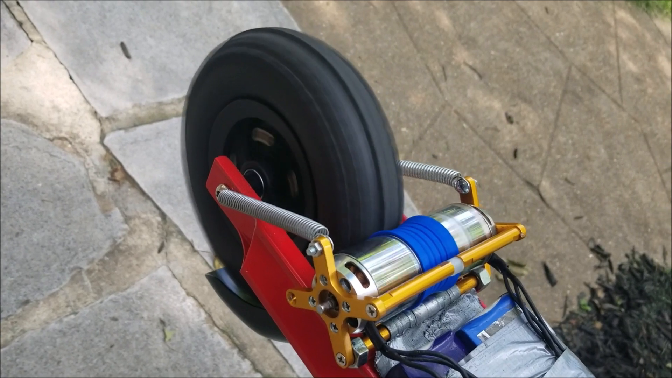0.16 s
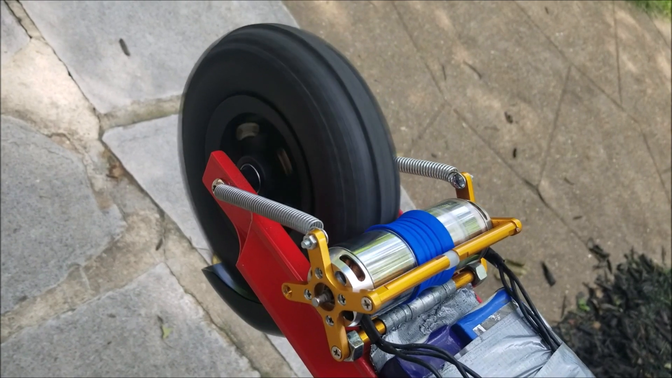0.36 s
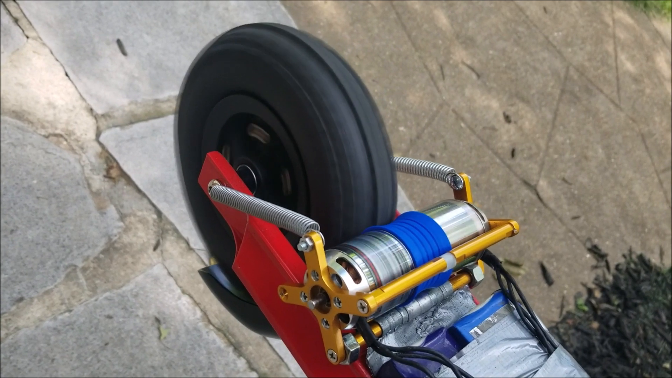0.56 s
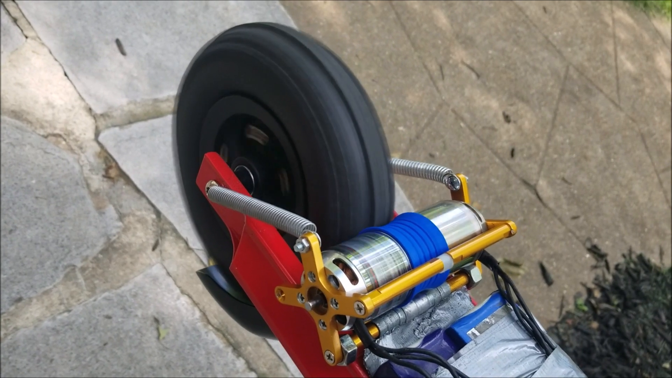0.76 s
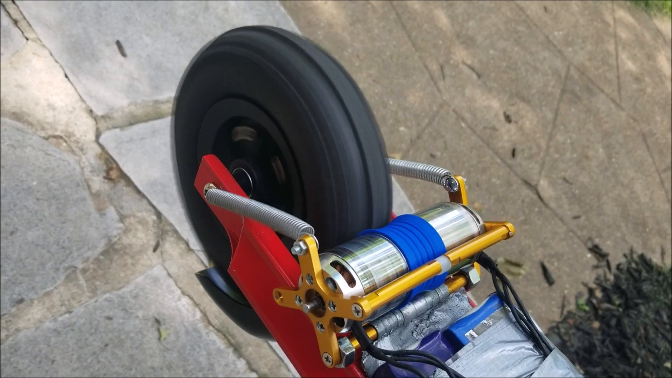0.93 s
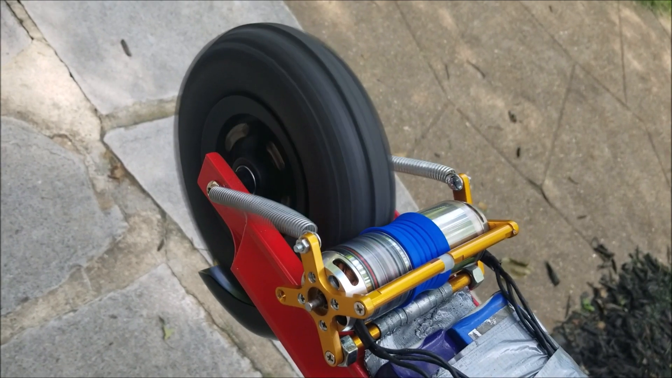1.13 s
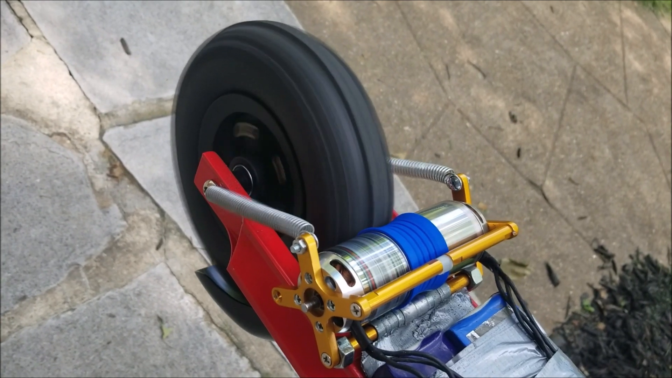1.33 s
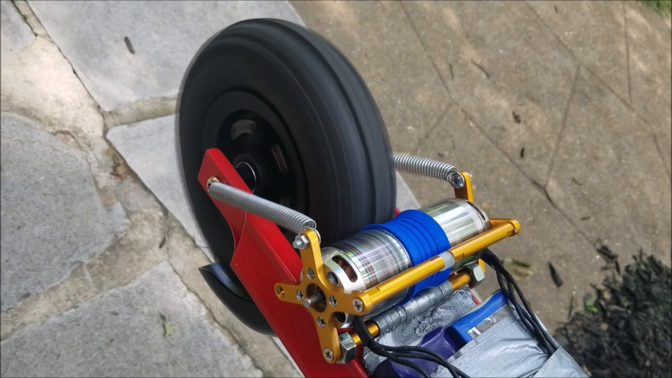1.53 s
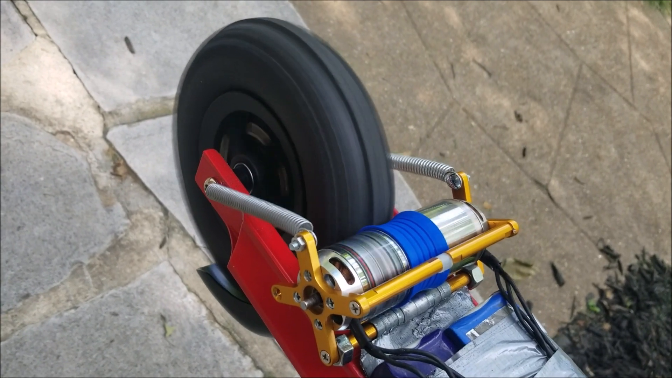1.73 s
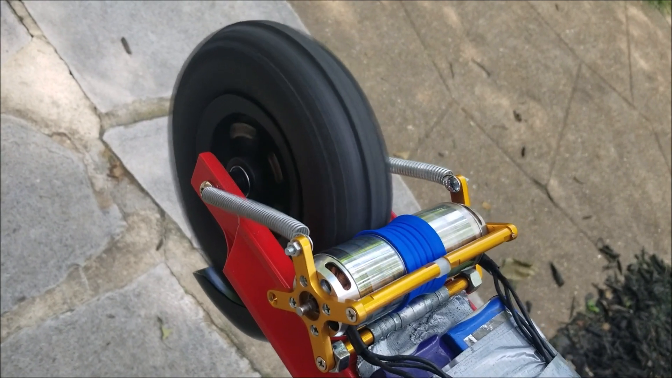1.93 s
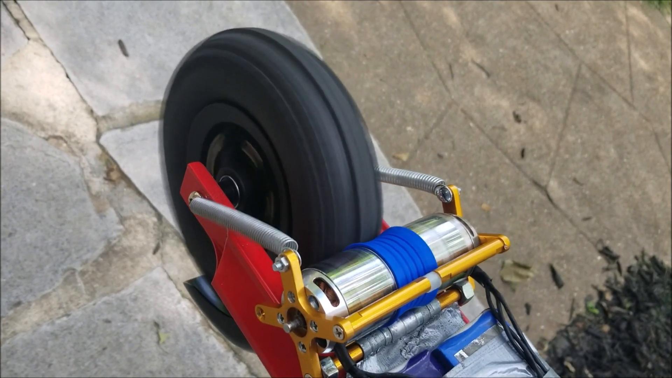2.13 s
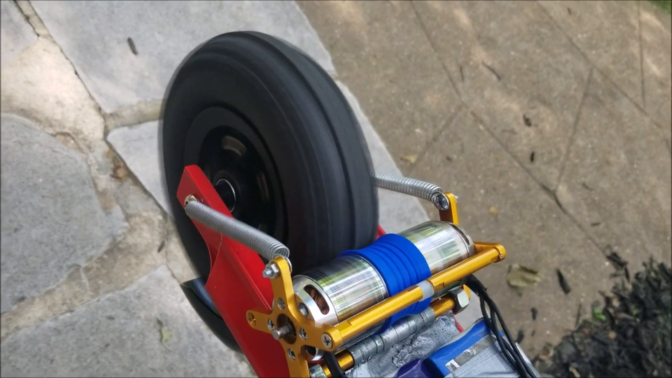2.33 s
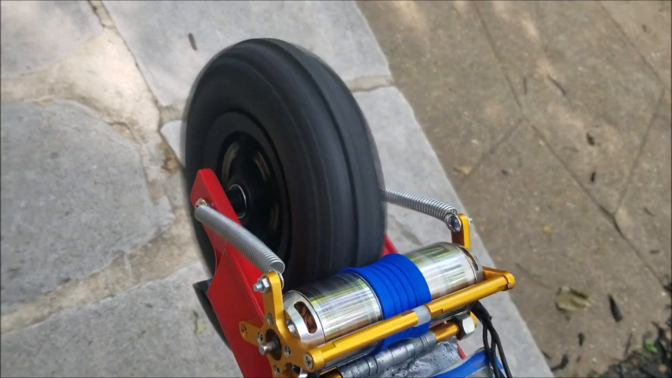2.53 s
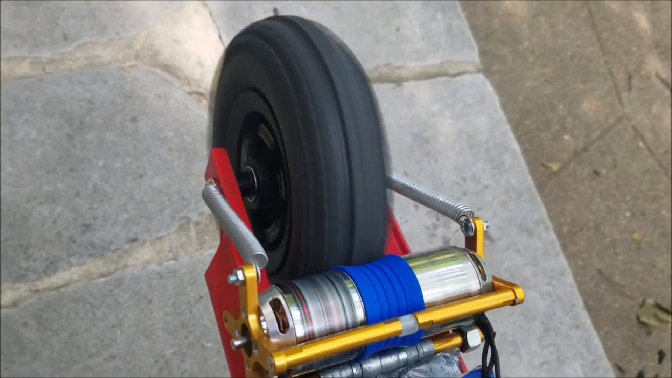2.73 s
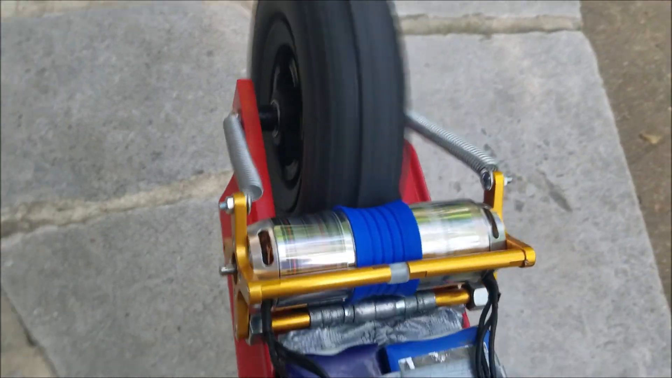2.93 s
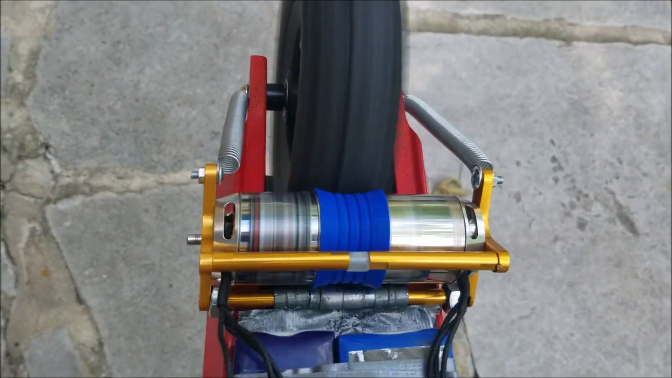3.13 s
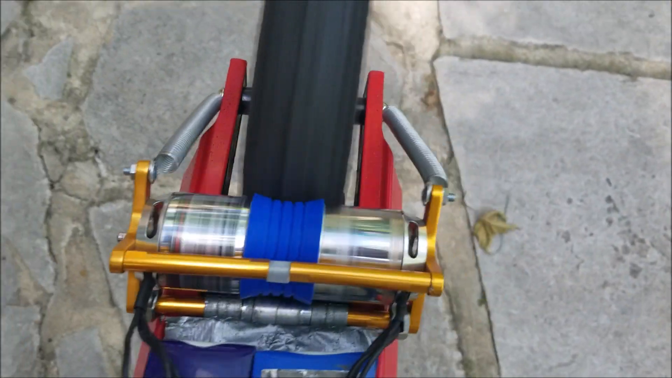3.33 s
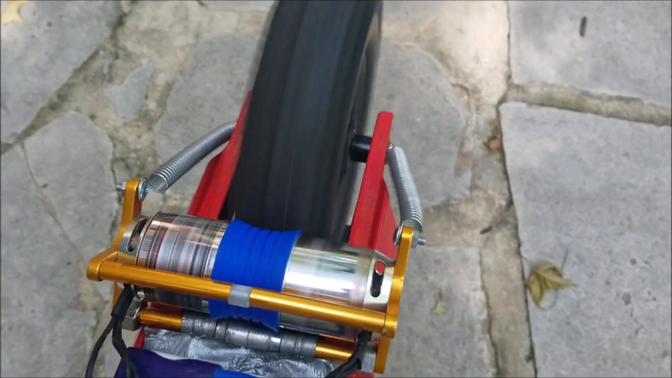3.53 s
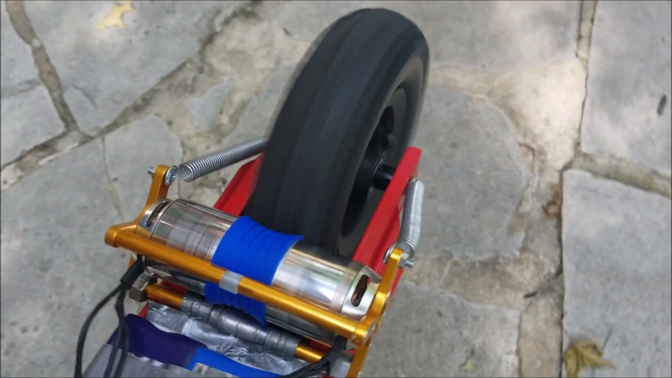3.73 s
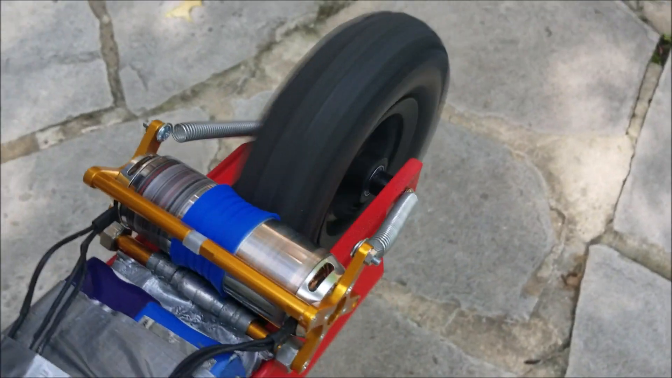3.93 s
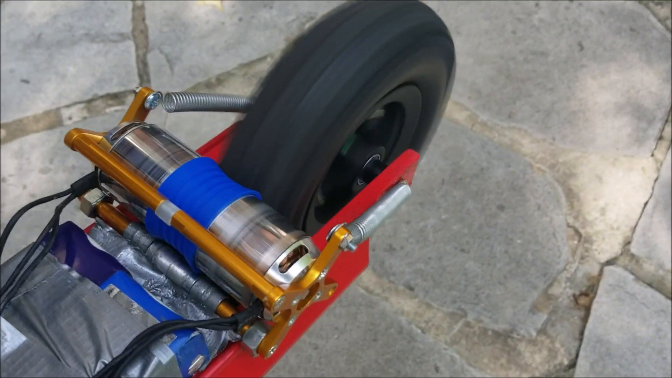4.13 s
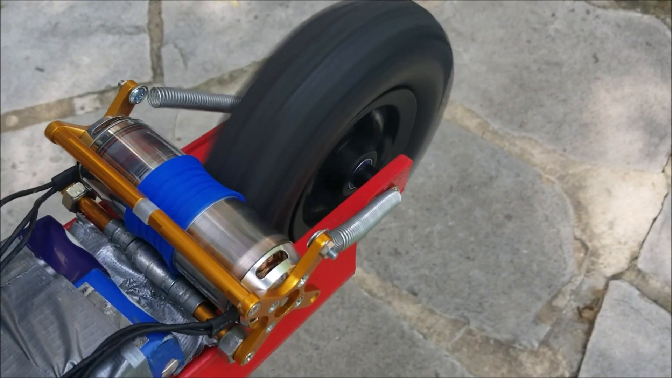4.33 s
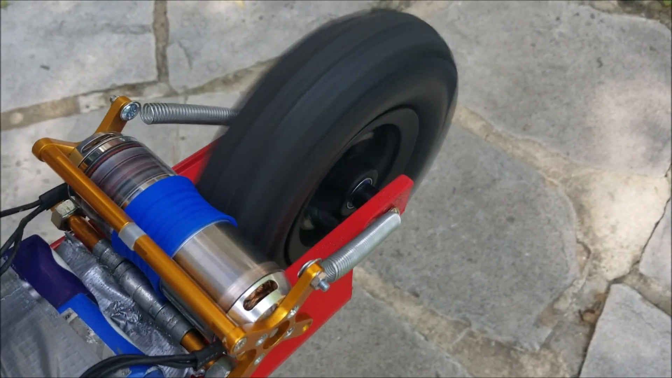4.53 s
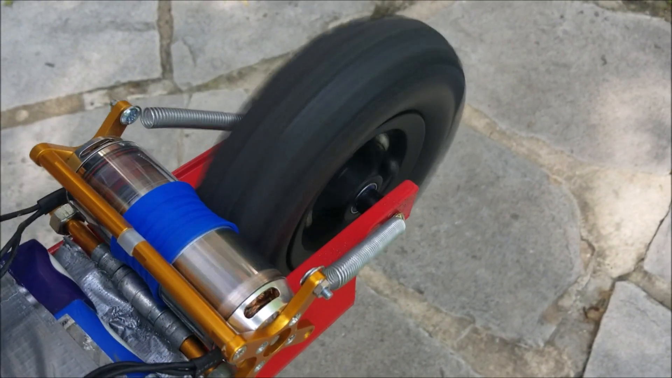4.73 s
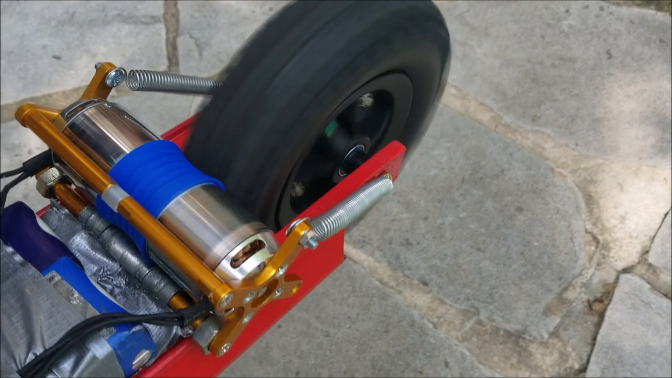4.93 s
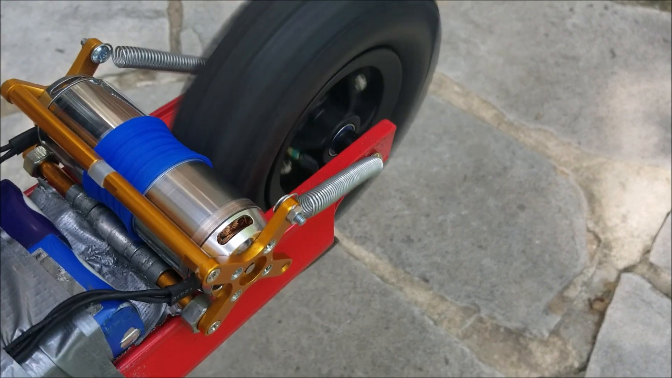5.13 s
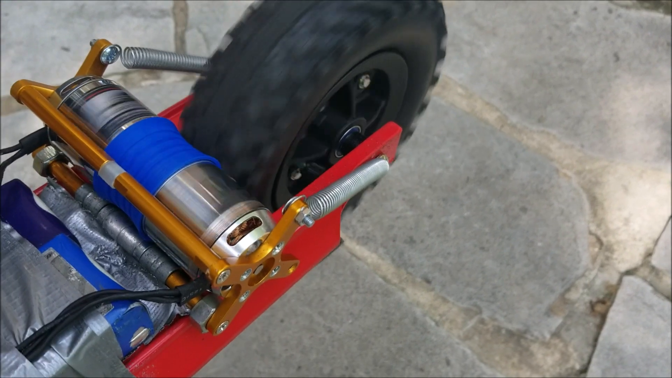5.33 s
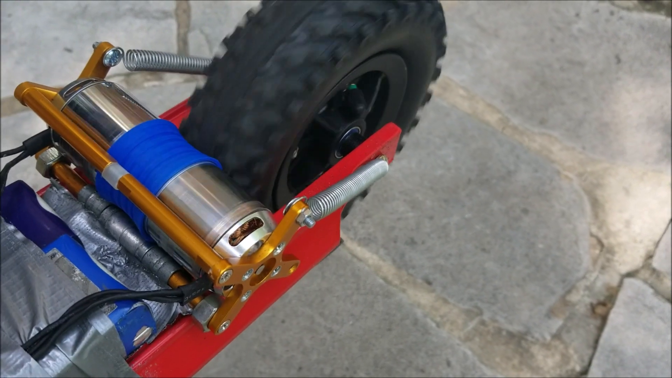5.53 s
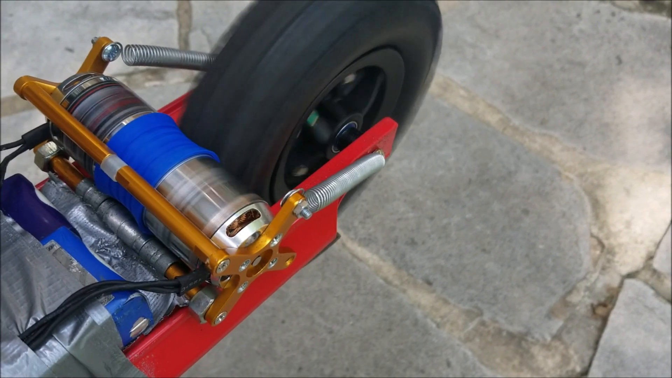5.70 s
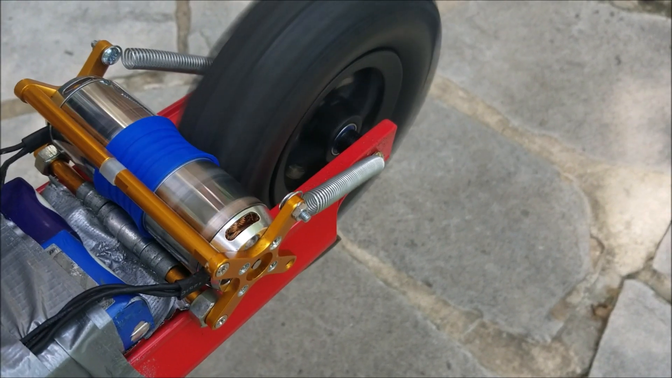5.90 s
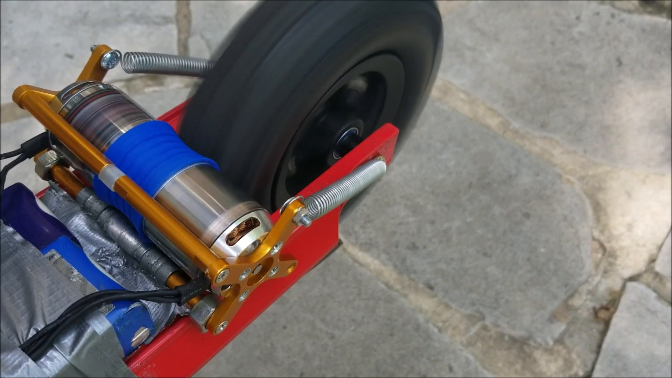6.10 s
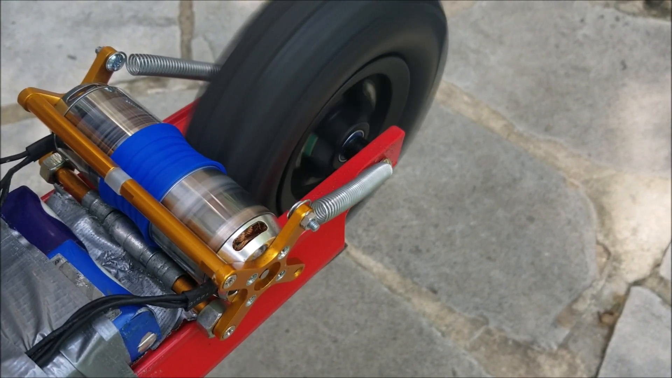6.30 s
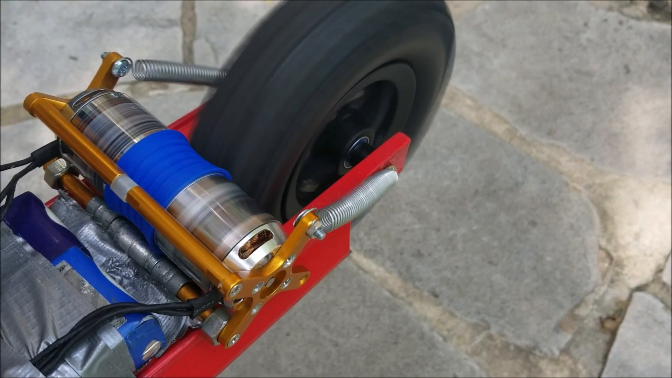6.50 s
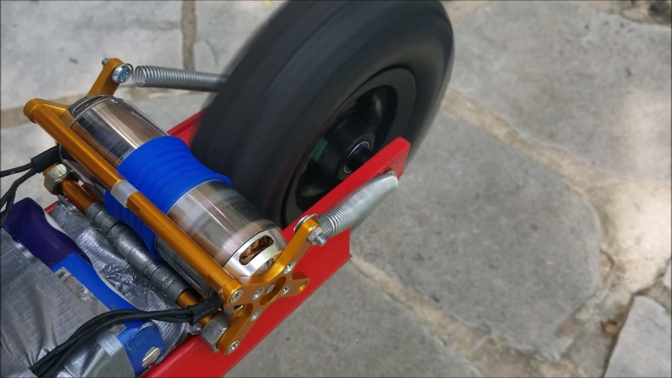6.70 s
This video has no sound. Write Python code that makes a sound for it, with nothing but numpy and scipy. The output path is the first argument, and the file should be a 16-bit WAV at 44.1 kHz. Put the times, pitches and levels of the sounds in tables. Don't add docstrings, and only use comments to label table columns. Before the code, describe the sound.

Outdoors and very close, two electric motors drive a roller against a knobby tyre. From 0 to 2 seconds a rough, layered whine climbs steadily by almost half an octave, tread hum below and metallic bearing tones above, wrapped in gritty rubber friction and bright air hiss pulsing rapidly. From 2 to 4.5 it holds at full speed; around 2.5 to 3.4 the microphone swings to the other end, shifting the tone colour and stereo balance, with brief bearing flares. At 4.5 the drive lets go and everything glides down, quietening to a near stop around 5.5, where faint dry clicks, thin high electronic whine and distant traffic rumble show through. From 5.6 it pulls away with splitting high tones and a steep rising whine, reaching full speed near 6.1. At 6.3 the pitch sags briefly, bottoms near 6.6, and rebounds to full speed by the end.

```python
import sys
import numpy as np
from scipy import signal
from scipy.fft import rfft, irfft, next_fast_len
from scipy.io import wavfile
from scipy.ndimage import uniform_filter1d, map_coordinates

SR = 44100
rng = np.random.default_rng(int(sys.argv[2]) if len(sys.argv) > 2 else 0)


def put_to_file(sound):
    columns = np.atleast_2d(sound).T
    safe = np.clip(columns, -1, 1)
    whole_steps = np.round(safe * 32767)
    wavfile.write(sys.argv[1], SR, whole_steps.astype(np.int16))


def how_loud(loudness_db):
    steps = np.asarray(loudness_db, float) / 20
    return 10 ** steps


N = 302511

# (frequency [Hz], density [dB/Hz])
TRAFFIC = [(15, -53), (25, -100), (43, 1), (147, -5), (216, -10.5), (262, -2.5), (283, -6.5), (318, -20),
           (818, -10.5), (1250, -16), (2500, -58), (3250, -61), (5500, -120)]
# (time [s], peak level [dB])
TICKS = [
    (5.3572, -56),
    (5.5413, -46),
]
# (time [s], speed [turns/s])
SPIN_UP = [(0.0, 71.3), (0.52, 77.6), (0.71, 78.4), (0.84, 81.9), (1.2, 88.4), (1.36, 89.4), (1.52, 92.2),
           (1.72, 94.4), (1.96, 98.8)]
# (time [s], speed [turns/s])
STOP_GO = [
    (4.54, 98.95),
    (5.33, 17.5),
    (5.44, 8.5),
    (5.55, 4.5),
    (5.65, 16),
    (5.77, 42),
    (5.91, 64.5),
    (6.045, 94),
    (6.12, 98.8),
]
# (time [s], speed [turns/s])
DIP = [
    (6.3, 98.8),
    (6.44, 82),
    (6.58, 72.3),
    (6.655, 72.6),
    (6.77, 96),
    (6.86, 98.5),
]
# (time [s], swing to second end [0-1], right-port lag [s], left over right [dB])
CAMERA = [(0, 0, 0, -1.5), (.7, 0, .00001, 0), (2.5, .05, .00004, .3), (3.0, .6, .00026, 0),
          (3.4, 1, .00032, 0), (4.3, 1, .00033, 0), (4.7, 1, .00036, -3), (5.8, 1, .00038, -2.5),
          (6.2, 1, .00036, -1), (6.86, 1, .00036, -2.3)]
# (time [s], level [dB])
NEAR = [(0, -0.5), (.7, -1.5), (1.4, 0), (2.5, 0), (3.0, 2), (3.6, 0), (4.4, 0.5), (5.0, 1.5), (6.1, 1),
        (6.86, 1)]
# (frequency [Hz], likeness [0-1])
ALIKE = [(60, 0.92), (600, 0.64), (1400, 0.33), (2500, 0.36), (5000, 0.27), (9000, 0.04), (14000, 0.057)]
# (frequency [Hz], phase [rad])
PORT_LEAD = [(100, 0), (600, .4), (1000, -.6), (1700, -1.6), (2400, -1.6), (3500, 0), (9000, .5),
             (11000, -1.8), (15000, 0)]
# (frequency [Hz], left over right [dB])
LEAN = [(60, -0.5), (110, 4), (200, 0.5), (380, 5), (700, 5.5), (1290, 2), (2380, 0), (4400, 1), (8120, 3),
        (15000, -0.5)]

# (level at full speed [dB], rise at second end [dB], knee [Hz], slope below [dB/decade],
# rise at full current [dB])
LAWS = [
    (-36.5, 1.5, 62.8, 42, 0.5),
    (-36, 1.5, 160, 48, 1),
    (-49, 0.5, 97, 54, 1),
    (-50.5, 8, 69, 56, 6),
]
# (frequency [Hz], density [dB/Hz])
BODY = [(200, -68), (350, -31.5), (480, -24), (700, -13), (1000, -12.5), (1350, -6.5), (1650, 0.5),
        (1850, 0), (2100, 0), (2350, -2.5), (2600, -7), (3100, -14.5), (3700, -20.5), (5000, -36)]
FRICTION = [(1880, -30), (3200, -3.5), (3750, -4.5), (4680, -2.5), (5440, -7), (6650, -6), (7670, -15),
            (8500, -27.5), (11000, -39), (18700, -120)]
AIR = [(6500, -42), (8000, -6), (9200, -6), (10400, -2.5), (11050, 5), (11280, 3.5), (11550, 4.5),
       (12200, 2.5), (14000, -1.5), (15500, 0.5), (15900, -7.5)]
DRUM = [(450, -40), (700, -6.5), (900, -1), (1100, 3), (1500, -47)]
PLATE = [(1600, -40), (1880, -10), (2000, 0), (2100, -10), (2400, -40)]
# (frequency [Hz], level [dB])
SHELL = [(2300, -40), (2620, -12), (2760, 0), (2900, -12), (3300, -40)]
# (frequency [Hz], level [dB])
WINDINGS = [(9500, -60), (10200, -26), (11000, -12), (11450, 0), (11800, -7), (12600, -16),
            (13200, -30), (13800, -70)]
# (shaft speed [turns/s], lower level [dB], upper level [dB])
CHOP = [(7, -50, -48), (12, -39, -45), (39.2, -24.5, -49), (62.4, -33, -53), (74, -42.5, -47),
        (81, -47, -51), (93, -58, -59), (99, -58, -59)]

# (frequency [Hz], level [dB])
FRAME = [(60, -34), (300, -20), (600, -8), (850, 0), (1050, 6), (1200, 0), (1400, -3), (1650, -3),
         (2000, 2), (2400, 0), (3300, -6)]
# (shaft multiple, level at first end [dB], level at second end [dB])
ORDERS = [(1.99, -55.5, -55), (4.043, -55.5, -53.5), (5.013, -50.5, -47.5), (5.35, -46.5, -46),
          (5.87, -42.5, -41), (6.76, -43.5, -47.5), (7.17, -45.5, -33), (7.8, -71, -37), (7.95, -44, -41.5),
          (8.21, -53, -47), (8.99, -70, -46), (9.21, -46.5, -44), (9.9, -73, -39.5), (9.9, -82, -49),
          (10.37, -50, -49), (11.39, -69, -37.5), (12.84, -53.5, -40), (13.84, -45, -43.5),
          (14.29, -50.5, -56), (16.12, -43.5, -35), (16.25, -77, -73), (18.7, -101, -71), (18.37, -70, -54),
          (18.4, -50, -53), (18.4, -60, -38), (20.8, -74, -48), (21.85, -29, -34), (23.92, -31.5, -50)]
# (frequency [Hz], level [dB])
TREAD_SINGS = [(40, -85), (150, -62), (250, -53), (440, -49), (510, -44), (555, -37), (585, -33),
               (612, -33)]
TWICE_FIRST = [(100, -80), (860, -48), (990, -44), (1040, -37), (1110, -36), (1150, -46), (1225, -47)]
TWICE_SECOND = [(100, -95), (600, -51), (760, -39), (1080, -33), (1160, -44), (1225, -47)]
SECOND_SINGS = [(100, -95), (700, -57), (960, -49), (1020, -37), (1090, -41), (1135, -44)]
THIRD_SINGS = [(120, -95), (600, -66), (950, -50), (1250, -48), (1400, -51), (1520, -43), (1700, -38.5)]
FOURTH_FIRST = [(160, -72), (1000, -46), (1640, -43), (1830, -33), (1890, -25.5), (2130, -30), (2270, -31)]
FOURTH_SECOND = [(160, -100), (1000, -60), (1750, -42), (2000, -29), (2150, -36), (2270, -32)]
NINTH_SINGS = [(400, -90), (3900, -60), (4250, -50), (4750, -51), (5100, -58)]
PAIR_FIRST = [(200, -90), (2070, -33), (2160, -26.5), (2235, -22), (2290, -35), (2385, -28), (2450, -37),
              (2870, -44)]
PAIR_SECOND = [(200, -100), (1360, -52), (1650, -37), (1800, -27), (2070, -23), (2150, -32), (2380, -41),
               (2870, -45)]
# (time [s], length [s], level [dB], left over right [dB])
FLARES = [(2.05, .1, 3, 4), (2.58, .06, 4, -3), (3.31, .07, 10, -12), (3.62, .14, 8, -12),
          (4.05, .12, 8, 10), (4.43, .14, 8, 10), (6.2, .17, 8, 10)]

WHEEL, TREAD, BALL = .17153, 36 * .17153, 5.735
PAIR_LOW, PAIR_HIGH, POLES = 28.68, 29.02, 14
FULL_HZ, CARRIER_HZ = 98.9, 11912


def unit(x):
    return x / np.sqrt(np.mean(x ** 2) + 1e-20)


def along(points, hz):
    f, v = np.transpose(points)
    return np.interp(np.log(hz + 1), np.log(f + 1), v)


def curves(rows):
    s, *cols = np.transpose(rows)
    return [np.interp(np.arange(N) / SR, s, c) for c in cols]


def wobble(rate):
    knots = rng.standard_normal(1000)
    return map_coordinates(knots, [np.arange(N) * min(rate, 100) / SR], order=1)


def filtered(x, response):
    m = next_fast_len(N + 8192)
    return irfft(rfft(x, m) * response(np.fft.rfftfreq(m, 1 / SR)), m)[..., :N]


def rush(spectrum, patchy_db):
    z = signal.stft(rng.standard_normal((2, N + 512)), nperseg=512)[2]
    field = uniform_filter1d(rng.standard_normal(z.shape[1:]), size=5, axis=0)
    field = uniform_filter1d(field, size=12, axis=1)
    pair = signal.istft(z * how_loud(patchy_db * unit(field)), nperseg=512)[1][:, :N]

    def mid_side(hz):
        turn = np.arccos(np.clip(along(ALIKE, hz), -1, 1)) / 2
        return how_loud(along(spectrum, hz)) * [np.cos(turn), np.sin(turn)]

    mid, side = filtered(pair, mid_side)
    return unit(np.array([mid + side, mid - side]))


def tone(cycles, level_db, rough, apart):
    size = np.sqrt(2) * how_loud(level_db + 7 * rough * wobble(24))
    phase = 2 * np.pi * (cycles + rng.random()) + 2.2 * rough * wobble(30)
    split, lean_db = apart * wobble(3), 7 * apart * wobble(4)
    return size * how_loud([lean_db, -lean_db]) * np.sin([phase + split, phase - split])


def camera_swing():
    return np.clip(curves(CAMERA)[0], 0, 1)


def pull(speed_hz):
    gain = uniform_filter1d(np.gradient(speed_hz) * SR, size=1200)
    coast, span = -100, 300
    return np.clip((gain - coast) / span, 0, 1)


def traffic():
    return how_loud(-55.5) * rush(TRAFFIC, patchy_db=1.5)


def ticks():
    out, t = np.zeros(N + 2000), np.arange(900) / SR
    for s, db in TICKS:
        click = how_loud(db + 9.5 - 60 * t / 0.02) * rng.standard_normal(len(t))
        out[round(s * SR):][:len(t)] += click
    return filtered(out[:N], lambda hz: hz / (hz + 2500))


def speed_rise_db(hz, knee, slope):
    return -10 * np.log10(1 + (knee / hz) ** (slope / 10))


def law_db(law, speed_hz):
    db, far_db, knee, slope, pull_db = law
    rise_db = speed_rise_db(speed_hz, knee, slope) - speed_rise_db(FULL_HZ, knee, slope)
    return db + far_db * camera_swing() + rise_db + pull_db * pull(speed_hz) + curves(NEAR)[0]


def turn_beat(turns):
    depths = (1, .12), (2, .12), (3, .1), (WHEEL, .05)
    return sum(depth * np.cos(2 * np.pi * (k * turns + rng.random())) for k, depth in depths)


def tyre_drum(speed_hz):
    return how_loud(-45.5 + speed_rise_db(speed_hz, 18.7, 77)) * rush(DRUM, patchy_db=2)


def frame_rattle(beat, frame_db):
    level = how_loud(frame_db + 7.5 + .8 * wobble(20))
    return level * (1 + .8 * beat) * rush(BODY, patchy_db=1.4)


def side_plate(frame_db):
    level = how_loud(frame_db + 1 + 2.2 * wobble(12) + [[-7], [0]])
    return camera_swing() * level * rush(PLATE, patchy_db=2)


def rotor_shell(speed_hz):
    duty = np.clip(speed_hz / FULL_HZ, 0, 1)
    hum = how_loud(-42) * np.clip(2 * pull(speed_hz) - .5, 0, 1) * np.exp(-((duty - .45) / .27) ** 2)
    level = np.hypot(how_loud(law_db(LAWS[3], speed_hz)), hum)
    return level * how_loud(2.2 * wobble(35)) * rush(SHELL, patchy_db=-2.5)


def rubber_friction(beat, jolt_db, speed_hz):
    hiss = how_loud(-60) * np.clip(2 * pull(speed_hz) - .5, .25, 1)
    level = np.hypot(how_loud(law_db(LAWS[1], speed_hz)), hiss)
    noise = unit((1 + 1.25 * beat) * rush(FRICTION, patchy_db=0.8))
    return level * how_loud(3 + .5 * jolt_db) * noise


def air_rush(beat, jolt_db, speed_hz):
    noise = unit((1 + 1.3 * beat) * rush(AIR, patchy_db=1.4))
    return how_loud(law_db(LAWS[2], speed_hz) + 10 + jolt_db) * noise


def contact(turns, speed_hz):
    beat, frame_db = turn_beat(turns), law_db(LAWS[0], speed_hz)
    jolt_db = 1.3 * wobble(60) + .4 * wobble(25)
    out = tyre_drum(speed_hz) + frame_rattle(beat, frame_db) + side_plate(frame_db)
    out += rotor_shell(speed_hz) + rubber_friction(beat, jolt_db, speed_hz)
    return out + air_rush(beat, jolt_db, speed_hz)


def switching(turns, speed_hz):
    driven = np.clip(8 * pull(speed_hz), 0, 1)
    first_end_db = -3.5 * (1 - curves(CAMERA)[0])
    full_throttle_db = -25 * np.clip((speed_hz - 88) / 8, 0, 1)
    shaft_hz, *sides_db = np.transpose(CHOP)

    def sideband_db(driven_db, idle_db):
        under_current_db = np.interp(speed_hz, shaft_hz, driven_db)
        return idle_db + driven * (under_current_db - idle_db) + first_end_db + full_throttle_db

    low_db, high_db = sideband_db(sides_db[0], -51), sideband_db(sides_db[1], -60)
    slow_db = high_db - .7 * np.clip(speed_hz - 18, 0, None)
    carrier = CARRIER_HZ * np.arange(N) / SR
    out = tone(carrier - POLES * turns, low_db - 3, rough=.5, apart=.6)
    out += tone(carrier + POLES * turns, high_db - 3.5, rough=.35, apart=.6)
    out += tone(carrier + 2 * POLES * turns, low_db - 27, rough=.4, apart=.6)
    out += tone(carrier - 2 * POLES * turns, slow_db - 7, rough=.6, apart=.6)
    out += tone(carrier - 3 * POLES * turns, slow_db - 10, rough=.6, apart=.6)
    return out + how_loud(low_db - 8.5) * rush(WINDINGS, patchy_db=2.5)


def force_db(speed_hz):
    return 32 * np.log10(speed_hz / FULL_HZ)


def lesser_whines(turns, speed_hz):
    swing, out = camera_swing(), np.zeros((2, N))
    for k, first_db, second_db in ORDERS:
        radiated_db = along(FRAME, k * speed_hz) - along(FRAME, k * FULL_HZ)
        level_db = first_db + swing * (second_db - first_db) + force_db(speed_hz) + radiated_db - 6.5
        lumpy = 1 + .6 * np.cos(2 * np.pi * (WHEEL * turns + rng.random()))
        out += lumpy * tone(k * turns, level_db, rough=.17, apart=.4)
    return out


def magnets(turns, speed_hz):
    gain = uniform_filter1d(np.gradient(speed_hz) * SR, size=3000)
    torque_db = np.clip(.13 * gain, 0, 17)
    shell_db = .5 * along(SHELL, 2 * POLES * speed_hz)
    level_db = -52 + 13 * camera_swing() + torque_db + force_db(speed_hz) + shell_db
    return tone(2 * POLES * turns, level_db, rough=.15, apart=.2)


def between_ends(k, first, second, speed_hz):
    swing = camera_swing()
    return (1 - swing) * along(first, k * speed_hz) + swing * along(second, k * speed_hz)


def beating_pair(turns, speed_hz):
    pair_db = between_ends(PAIR_HIGH, PAIR_FIRST, PAIR_SECOND, speed_hz)
    out = tone(PAIR_LOW * turns, pair_db - 3.5, rough=.35, apart=.25)
    return out + tone(PAIR_HIGH * turns, pair_db - 1.5, rough=.3, apart=.25)


def bearing_balls(turns, speed_hz):
    t, swing = np.arange(N) / SR, camera_swing()
    flare_db = np.zeros((2, N))
    for s, length, db, pan_db in FLARES:
        sides_db = np.array([[db + pan_db / 2], [db - pan_db / 2]])
        flare_db += np.exp(-((t - s) / length) ** 2) * sides_db
    beat = 1 - .55 * np.cos(2 * np.pi * (t - .6) / 1.43)
    loose_db = 8 * np.clip(1 - 8 * pull(speed_hz), 0, 1)
    third_db = along(THIRD_SINGS, 3 * BALL * speed_hz) + 2 * swing
    fourth_db = between_ends(4 * BALL, FOURTH_FIRST, FOURTH_SECOND, speed_hz) - 2 + loose_db
    ninth_db = along(NINTH_SINGS, 9 * BALL * speed_hz) - 6 * swing
    out = tone(2 * BALL * turns, along(SECOND_SINGS, 2 * BALL * speed_hz), rough=.2, apart=.2)
    out += how_loud(flare_db) * tone(3 * BALL * turns, third_db, rough=.18, apart=.1)
    out += beat * tone(4 * BALL * turns, fourth_db, rough=.4, apart=.2)
    return out + tone(9 * BALL * turns, ninth_db, rough=.4, apart=.3)


def tread_knobs(turns, speed_hz):
    swing = camera_swing()
    tread_db = along(TREAD_SINGS, TREAD * speed_hz) - 9 * np.sin(np.pi * swing ** 2) + .5 * swing
    twice_db = between_ends(2 * TREAD, TWICE_FIRST, TWICE_SECOND, speed_hz)
    out = tone(TREAD * turns, tread_db, rough=.06, apart=.12)
    return out + tone(2 * TREAD * turns, twice_db, rough=.2, apart=.2)


def whines(turns, speed_hz):
    out = lesser_whines(turns, speed_hz) + magnets(turns, speed_hz) + beating_pair(turns, speed_hz)
    return out + bearing_balls(turns, speed_hz) + tread_knobs(turns, speed_hz)


def scene():
    speed_hz = curves(SPIN_UP + STOP_GO + DIP)[0]
    speed_hz = uniform_filter1d(speed_hz, size=1800)
    turns = np.cumsum(speed_hz) / SR
    _, lag, pan_db = curves(CAMERA)
    swing, sign = camera_swing(), np.array([[.5], [-.5]])
    near = ticks() + contact(turns, speed_hz) + whines(turns, speed_hz)
    shaded = filtered(near, lambda hz: np.exp(1j * sign * along(PORT_LEAD, hz)))
    left, right = how_loud(sign * pan_db) * ((1 - swing) * shaded + swing * near)
    right = map_coordinates(right, [np.arange(N) - lag * SR])
    return traffic() + np.array([left, right]) + switching(turns, speed_hz)


def roll_off(x):
    return signal.sosfilt(signal.butter(12, 17090, fs=SR, output="sos"), x)


def record(dry):
    sides = np.array([[.5], [-.5]])
    ports = filtered(dry, lambda hz: how_loud(sides * along(LEAN, hz)) * (hz < 15920))
    return roll_off(ports)


dry = scene()
out = record(dry)
put_to_file(out)
```